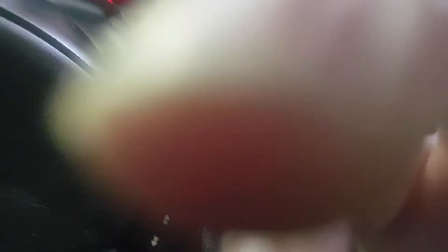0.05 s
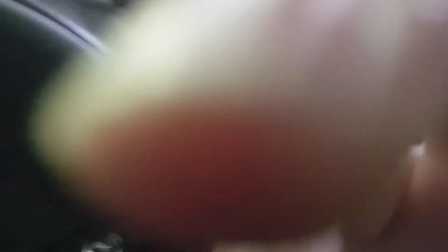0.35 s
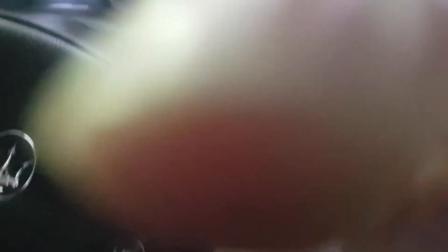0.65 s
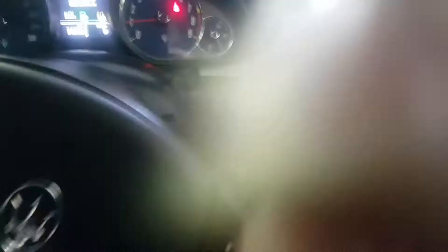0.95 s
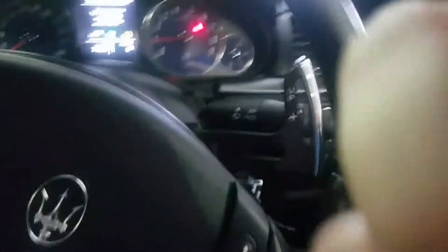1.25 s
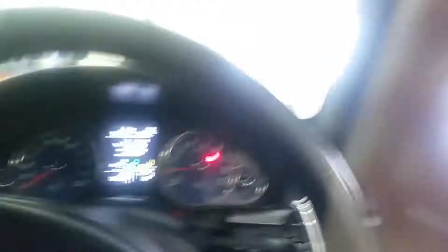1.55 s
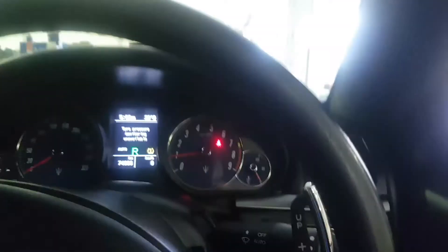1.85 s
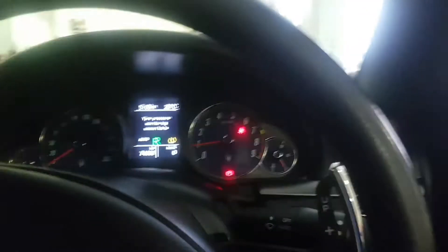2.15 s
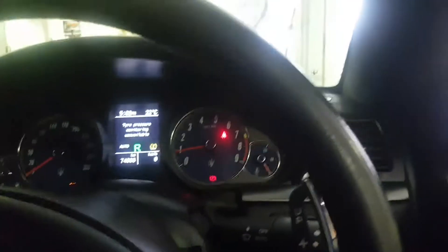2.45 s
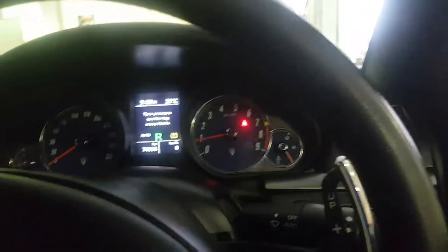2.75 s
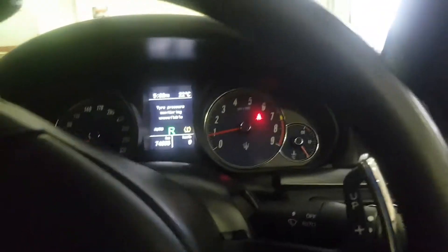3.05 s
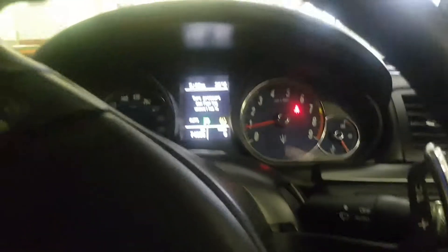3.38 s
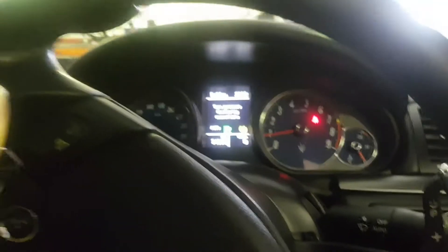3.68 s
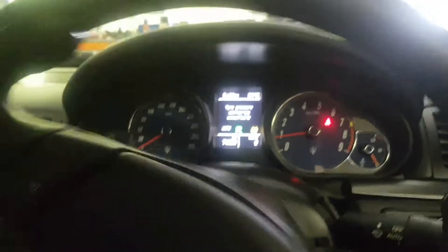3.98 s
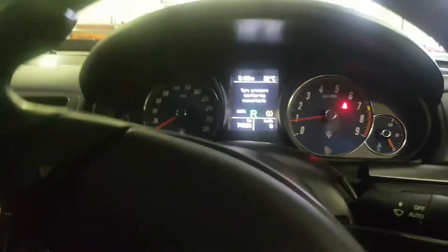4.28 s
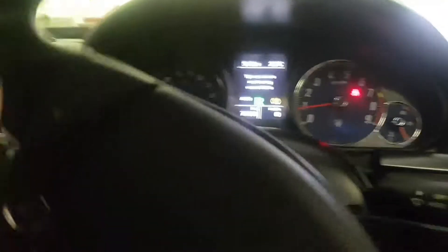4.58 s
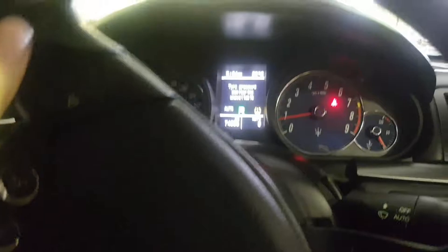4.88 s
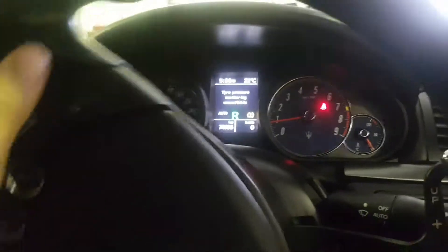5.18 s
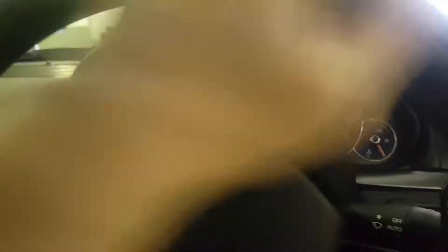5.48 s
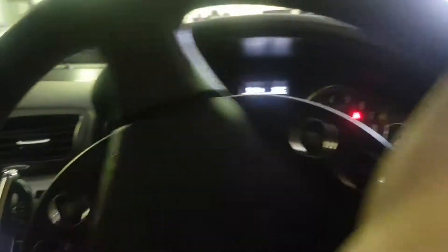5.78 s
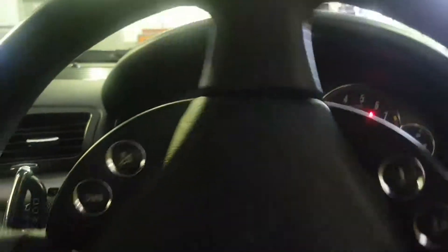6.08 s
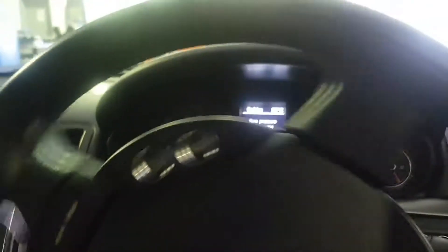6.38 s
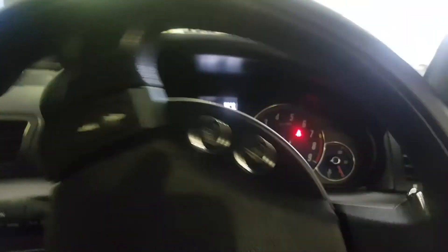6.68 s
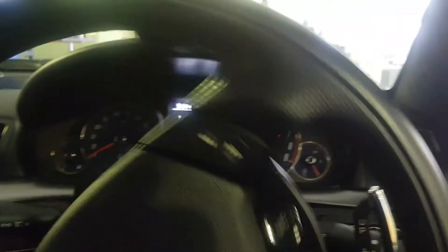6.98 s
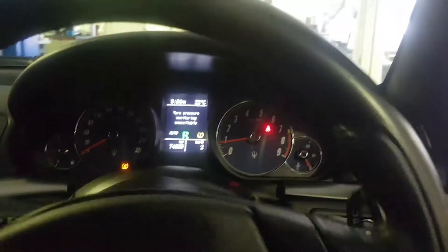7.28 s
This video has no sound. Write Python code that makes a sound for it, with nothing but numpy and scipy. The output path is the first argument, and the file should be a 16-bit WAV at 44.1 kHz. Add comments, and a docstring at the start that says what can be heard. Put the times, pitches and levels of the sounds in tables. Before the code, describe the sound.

Heard in stereo from the driver's seat, a just-started V8 drops from raised revs into a loud, deep, burbling idle, muffled by the cabin. Early on an exhaust leak spits over the hiss and ticking from behind the dashboard, then dies down. A few faint, close hand rubs on the wheel come and go. At the end the wheel turns, adding a soft pump whirr while the engine keeps rumbling.

```python
"""A cold cross-plane V8 with an open exhaust sinks from its starting flare to a lumpy idle.
Heard from the driver's seat on a hand-held stereo pair: the exhaust booms and burbles through the cabin,
which shuts out most of it above 340 Hz. Behind the dashboard the engine bay hisses and valves tick;
one bank spits through a leak for the first seconds. Close by, hands rub on the wheel now and then.
Near the end the wheel is turned: the steering pump whirrs and the idle sags a little."""
import sys
import numpy as np
from scipy import signal
from scipy.fft import rfft, irfft, next_fast_len
from scipy.io import wavfile
from scipy.ndimage import uniform_filter1d, minimum_filter1d, map_coordinates

SR = 44100
rng = np.random.default_rng(int(sys.argv[2]) if len(sys.argv) > 2 else 0)


def wav_record(signal):
    """Record a signal, one row per channel, as 16-bit PCM in the file named by sys.argv[1]."""
    frames = np.transpose(np.atleast_2d(signal))
    bounded = np.clip(frames, -1, 1)
    # unit amplitude maps onto the largest positive 16-bit level
    quanta = np.round(bounded * 32767).astype(np.int16)
    wavfile.write(sys.argv[1], SR, quanta)


N = 323694
CUTOFF_HZ = 15720

# the cylinders in firing order: (puff through the leak [dB], rasp in the tailpipe [dB])
CYLINDERS = [(-10, -7), (1, 0), (-2.5, -1), (3.4, -7), (2, 1), (-1, -8), (1.5, -1), (0, -6)]


def from_db(db):
    """Decibels to gain."""
    return 10 ** (np.asarray(db) / 20)


def rms_one(x):
    """Scale to unit power."""
    return x / np.sqrt(np.mean(x ** 2) + 1e-20)


def at_hz(points, hz):
    """Read a spectrum on a log-frequency axis."""
    f, value = np.transpose(points)
    return np.interp(np.log(np.maximum(hz, 1)), np.log(f), value)


def drift(hz, step=1):
    """Slow random wander with spread 1, one value every step samples."""
    r = np.exp(-200 * np.pi * hz / SR)
    slow = signal.lfilter([1], [1, -2 * r, r * r], rng.standard_normal(N // 100 + 2002))[2000:]
    return np.interp(np.arange(0, N, step) / 100, np.arange(len(slow)), rms_one(slow))


def held(start_s, end_s, edge_s):
    """Rises smoothly from 0 towards 1 around the start, holds, and falls around the end."""
    s = np.arange(N) / SR
    return (np.tanh(2 * (s - start_s) / edge_s) - np.tanh(2 * (s - end_s) / edge_s)) / 2


def resonate(x, hz, width_hz):
    """One resonance with gain 1 at its peak."""
    r = np.exp(-np.pi * width_hz / SR)
    feedback = [1, -2 * r * np.cos(2 * np.pi * hz / SR), r * r]
    return signal.lfilter(np.array([1, 0, -1]) * (1 - r * r) / 2, feedback, x)


def turbulence(spectrum):
    """Stereo noise of a given colour, diffuse in the treble; rms 1."""
    # how alike the two microphones hear it: (frequency [Hz], likeness [0-1])
    likeness = [(100, 1), (400, 0.94), (1000, 0.44), (2000, 0.52), (4000, 0.081), (16000, 0.026)]
    hz = np.linspace(0, SR / 2, next_fast_len(N) // 2 + 1)
    mid, side = rfft(rng.standard_normal((2, 2 * len(hz) - 2)))
    alike = at_hz(likeness, hz)
    pair = np.sqrt(1 + alike) * mid + np.sqrt(1 - alike) * side * [[1], [-1]]
    return rms_one(irfft(pair * from_db(at_hz(spectrum, hz)) * (hz < CUTOFF_HZ))[:, :N])


def beats(count):
    """The samples at which a running count passes a whole number."""
    return np.flatnonzero(np.diff(np.floor(count))) + 1


def puffs(count, pattern_db, scatter_db, rise_ms, fall_ms):
    """An envelope with one puff per beat, its strength following a repeating pattern; rms 1."""
    at, kicks = beats(count), np.zeros(N)
    level_db = np.asarray(pattern_db)[count[at].astype(int) % len(pattern_db)]
    kicks[at] = from_db(level_db + scatter_db * rng.standard_normal(len(at)))
    for ms in (rise_ms, fall_ms):
        kicks = signal.lfilter([1], [1, -np.exp(-1000 / (ms * SR))], kicks + 1e-18)
    return rms_one(kicks)


def crank_rpm(flare, settled_rpm, flare_rpm, sag_from_s, sag_rpm_per_s):
    """The starting flare dies away to an idle that hunts slowly and sags under the steering pump."""
    s = np.arange(N) / SR
    hunt_rpm = 2.8 * np.cos(2 * np.pi * (s - 0.72) / 4.28)
    sag_rpm = sag_rpm_per_s * np.maximum(s - sag_from_s, 0)
    return settled_rpm + flare_rpm * flare + hunt_rpm - sag_rpm


def exhaust_boom(turns, fired, firing_hz, waver_db):
    """The firing rate and two overtones slide through the resonances of pipe and cabin as revs sink."""
    # those resonances: (centre [Hz], width [Hz], level [dB])
    peaks = [(70.8, 13.5, -13.5), (114.2, 10.1, -11), (141, 29, -14), (164.5, 10, -22), (212, 98, -32)]
    # brief swells and dips at crank orders 8 and 12: (start [s], end [s], change [dB])
    swells_8 = [(0.5, 0.76, 3), (1.1, 1.7, -2), (2.08, 2.336, -2.5), (3.252, 3.424, -3), (4.1, 4.36, 3.5),
                (6.2, 7.05, -1.3), (7.094, 7.4, 3.5)]
    swells_12 = [(4.4, 5.62, 5.9), (7.09, 7.4, 5.7)]
    # pulses come early and late: once per cycle of two turns, and three times with each bank's gaps
    lope = .02 * np.sin(np.pi * turns) + .028 * np.sin(3 * np.pi * turns)
    lope *= 1 + .45 * drift(3.9)
    slip = .35 * drift(0.41)   # the shortest wave shifts as the path to the microphone changes
    pulses = fired - 0.313   # each leaves the pipe a fraction of a firing late
    boom = 0
    for harmonic, swells, shift in [(1, [], 0), (2, swells_8, lope), (3, swells_12, lope + slip)]:
        hz = harmonic * firing_hz
        peaks_db = [db - 20 * np.log10(1 + (2 * (hz - centre) / width) ** 2)
                    for centre, width, db in peaks]
        swell_db = sum(db * held(start, end, edge_s=0.13) for start, end, db in swells)
        level_db = np.max(peaks_db, axis=0) + swell_db + waver_db * drift(7.8)
        boom += from_db(level_db) * np.cos(2 * np.pi * (harmonic * pulses + shift))
    return np.sqrt(2) * boom


def exhaust_burble(turns, rpm, idle_rpm, wander, wander_hz, stereo_spread):
    """Each bank fires at uneven gaps, so half orders sound; they slide through the cabin's response."""
    # tones of the uneven firing, at idle: (crank order [cycles per turn], level [dB])
    half_orders = [(5.5, -14), (6.5, -15), (8.5, -5.5), (9, -17), (9.5, -2.5), (10, -11.5), (10.5, -6.5),
                   (11, -11.5), (11.5, -14), (12.5, -8.5), (13, -15.5), (13.5, -3), (14, -7.5), (14.5, -24),
                   (15, -6.5), (15.5, -9), (16, -16), (16.5, -14.5), (17, -15), (17.5, -10.5), (18, -14),
                   (18.5, -5.5), (19, -8.5), (19.5, -13.5), (20, -5.5), (20.5, -13.5), (21, -22),
                   (21.5, -14.5), (22.5, -11), (23, -6.5), (23.5, -19), (24, -17), (26.5, -22.5), (28, -24),
                   (29.5, -22.5), (32, -24)]
    # what the cabin lets through to the seat: (frequency [Hz], gain [dB])
    cabin = [(50, -27), (85, -31.5), (125, -7), (185, -2.5), (215, -3.5), (245, -2), (275, 1), (295, 2),
             (325, -4), (360, -13), (430, -21.5), (500, -42)]
    step = 10   # bass only: a coarse time grid will do
    burble, turns, rpm = 0, turns[::step], rpm[::step]
    for order, db in half_orders:
        colour_db = at_hz(cabin, order * rpm / 60) - at_hz(cabin, order * idle_rpm / 60)
        angle = 2 * np.pi * (order * turns + rng.random())
        angle += 0.74 * drift(0.58, step)   # the path to the microphone keeps changing
        sway = 1 + wander * (drift(wander_hz, step) + 1j * drift(wander_hz, step))
        # short waves differ more between the microphones
        side = stereo_spread * order * (rng.normal() + 1j * rng.normal())
        pair = np.array([[1 + side], [1 - side]])
        burble += from_db(db + colour_db) * (pair * sway * np.exp(1j * angle)).real
    return rms_one(signal.resample_poly(burble, step, 1, axis=1, window=("kaiser", 10))[:, :N])


def cold_lumps(fired, band_hz):
    """No two cold firings burn alike: each one's surplus or lack thumps the air in the cabin."""
    # air modes of the cabin: (frequency [Hz], width [Hz], level [dB])
    modes = [(94, 23, -6.5), (145, 28, -1), (194.4, 31, -1.5), (223, 5.7, -5.5), (273.5, 20.3, 2),
             (292, 14, 1.5), (318.8, 14.5, 0.5), (404, 53, -13)]
    at, kicks = beats(fired), np.zeros(N)
    kicks[at] = rng.standard_normal(len(at))
    rings = sum((-1) ** k * from_db(db) * resonate(kicks + 1e-18, hz, width)
                for k, (hz, width, db) in enumerate(modes))
    return rms_one(signal.sosfilt(signal.butter(4, band_hz, "band", fs=SR, output="sos"), rings))


def tailpipe_rasp(fired):
    """Gas noise in the tailpipe swells with each firing."""
    # the rasp from inside the cabin: (frequency [Hz], density [dB])
    spectrum = [(20, -2), (60, 3.5), (300, -1.5), (390, 4.5), (500, 2.5), (640, 0), (760, 0), (820, -2.5),
                (960, -1), (1150, -12), (1600, -15), (4000, -44)]
    gas = turbulence(spectrum)
    surges = puffs(fired, np.transpose(CYLINDERS)[1], scatter_db=3, rise_ms=1, fall_ms=16)
    return gas * rms_one(2.5 + surges)


def bay_hiss(seated):
    """The engine bay hisses behind the dashboard, pulsing with the clatter of the valves."""
    # the bay from the driver's seat: (frequency [Hz], density [dB])
    spectrum = [(600, -8), (1170, -4), (1340, -0.5), (1430, 0), (1520, 1), (1630, -0.5), (1900, -4),
                (2270, 0), (2480, -5), (2750, -2.5), (3250, -7.5), (4700, -8.5), (8000, -14.5),
                (9300, -21.5), (11800, -16.5), (16000, -17)]
    clatter = rms_one(2 + puffs(seated, [0], scatter_db=3, rise_ms=.4, fall_ms=5))
    return turbulence(spectrum) * clatter


def valve_ticks(seated):
    """Each valve lands on its seat with a short, bright tick."""
    # colour of a tick: (frequency [Hz], density [dB])
    spectrum = [(1000, -15), (2500, 13), (5000, 7), (8000, -9.5), (9400, -19.5), (11800, 5), (16000, 15)]
    return puffs(seated, [0, -2], scatter_db=2.8, rise_ms=.1, fall_ms=1.8) * turbulence(spectrum)


def leak_opening(open_s, seals_at_s, seal_s, seep_share, seep_s):
    """The leak works open (0 to 1), holds, then all but seals; the remaining seep dies slowly."""
    s = np.arange(N) / SR
    sealed_s = np.maximum(s - seals_at_s, 0)
    closing = (1 - seep_share) * np.exp(-sealed_s / seal_s) + seep_share * np.exp(-sealed_s / seep_s)
    return np.minimum(s / open_s, 1) * closing


def leak_spit(fired):
    """Exhaust gas spits through the leak, harder for some cylinders than for others."""
    # the escaping gas: (frequency [Hz], density [dB])
    spectrum = [(500, -21), (850, 18), (1200, -31), (1570, 17), (2000, 4.5), (2800, 6.5), (4300, -0.5),
                (7700, 1), (9300, -6), (11800, 0), (16000, 2.5)]
    spits = puffs(fired, np.transpose(CYLINDERS)[0], scatter_db=1.3, rise_ms=1.5, fall_ms=5.6)
    return turbulence(spectrum) * spits


def wheel_rubs(grain_db):
    """Hands rub on the wheel's rim, close by: short swells of grainy friction noise."""
    # strokes of the hands: (middle [s], half length [s], level [dB])
    rubs = [(0.373, 0.03, -32), (0.471, 0.016, -29), (2.213, 0.011, -31.5), (4.05, 0.043, -41.5),
            (4.206, 0.017, -50), (5.078, 0.057, -41), (6.645, 0.062, -42), (7.004, .1, -40.5)]
    # friction on the rim: (frequency [Hz], density [dB])
    spectrum = [(1000, -20), (1750, -6), (2050, -1), (2300, -0.5), (2900, -8), (3500, -11), (9000, -21.5)]
    s = np.arange(N) / SR
    strokes = sum(from_db(db) * np.exp(-.5 * ((s - middle) / half) ** 2) for middle, half, db in rubs)
    return strokes * from_db(grain_db * drift(80)) * turbulence(spectrum)


def steering_pump(load):
    """The pump hisses and whirrs while the hard-turned wheel loads it."""
    # the pump from the driver's seat: (frequency [Hz], density [dB])
    spectrum = [(1000, -12), (2050, -6), (2280, 4.5), (2500, -2), (2900, -2), (3400, -7), (4200, -10),
                (4600, -1), (5000, -6.5), (8000, -10), (9400, -18), (12000, -8.5), (16000, -10)]
    return load * turbulence(spectrum)


def standing_waves(x, depth_db, spacing_hz, change_hz):
    """The hand-held microphones move through the cabin's standing waves: narrow bands swell and fade."""
    # colour of the left microphone against the right: (frequency [Hz], gain [dB])
    left_colour = [(350, -4), (600, -2.5), (900, -1.5), (1700, 1.5), (2300, 0), (6000, 1), (8000, 6.5),
                   (9500, 4), (12000, 2), (16000, 6.5)]
    hz, s, bins = signal.stft(x, SR, nperseg=1024)
    place = np.meshgrid(hz / spacing_hz, s * change_hz, indexing="ij")
    field = map_coordinates(rng.standard_normal((600, 80)), place, order=3, mode="wrap")
    colour_db = np.array([.5, -.5])[:, None, None] * at_hz(left_colour, hz)[:, None]
    return signal.istft(bins * from_db(depth_db * field + colour_db), SR)[1][:, :N]


def microphone_pair(left, right, lag_ms, balance_db):
    """The sound reaches the left microphone later and softer than the right."""
    late = np.interp(np.arange(N) - lag_ms * SR / 1000, np.arange(N), left)
    return np.array([late, right]) * from_db([[-balance_db / 2], [balance_db / 2]])


def scene():
    """The mix at the driver's seat: the crank times the engine; flare, leak and steering move levels."""
    flare = np.exp(-np.arange(N) / SR / 0.999)
    opening = leak_opening(open_s=1.43, seals_at_s=2.22, seal_s=0.14, seep_share=0.44, seep_s=1.16)
    steering = held(start_s=6.42, end_s=7.3, edge_s=0.22)
    rpm = crank_rpm(flare, settled_rpm=830.55, flare_rpm=342.5, sag_from_s=6.26, sag_rpm_per_s=13.1)
    turns = np.cumsum(rpm) / (60 * SR) + .017 * drift(1.1)   # the crank never runs quite evenly
    fired = 4 * turns + .38   # four firings a turn

    exhaust = exhaust_boom(turns, fired, firing_hz=4 * rpm / 60, waver_db=0.96)
    burble = exhaust_burble(turns, rpm, idle_rpm=835.3, wander=0.34, wander_hz=0.54, stereo_spread=.0068)
    exhaust = exhaust + from_db(-15 - 4.5 * flare + opening + 1.3 * steering) * burble
    exhaust += from_db(-26.5 + 9 * flare + 5 * opening) * cold_lumps(fired, band_hz=(82, 347.5))

    noises = from_db(-33.5 + 2.5 * flare + 1.5 * steering) * tailpipe_rasp(fired)
    seated = 2 * fired + .17 * drift(25)   # an inlet and an exhaust valve per firing, never quite on time
    noises += from_db(-35.6 + flare + 5 * opening) * bay_hiss(seated)
    noises += from_db(-59 + 14 * flare + 7 * opening) * valve_ticks(seated)
    noises += from_db(-31) * opening * leak_spit(fired)
    noises += wheel_rubs(grain_db=2.5)
    noises += from_db(-39.5) * steering_pump(steering)
    left, right = exhaust + standing_waves(noises, depth_db=2.06, spacing_hz=108.9, change_hz=4.45)
    return microphone_pair(left, right, lag_ms=0.395, balance_db=2.5)


def record(dry):
    """A look-ahead limiter holds the highest peaks, the ends fade and the top is cut steeply."""
    headroom = np.minimum(1, .98 / (np.abs(dry).max(axis=0) + 1e-9))
    gain = uniform_filter1d(minimum_filter1d(headroom, size=441), size=441)
    fade = signal.windows.tukey(N, .008 * SR / N)
    return signal.sosfilt(signal.ellip(10, .1, 80, CUTOFF_HZ, fs=SR, output="sos"), dry * gain * fade)


dry = scene()
out = record(dry)
wav_record(out)
```